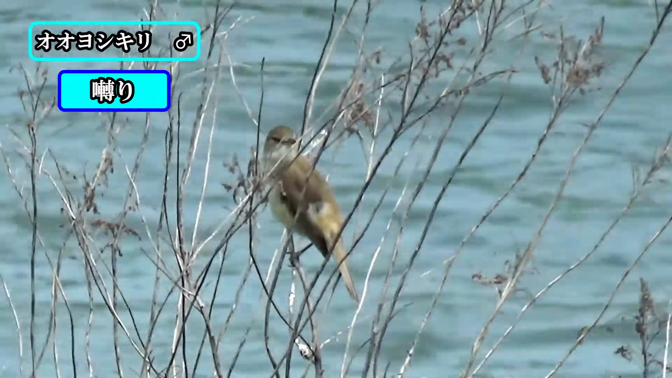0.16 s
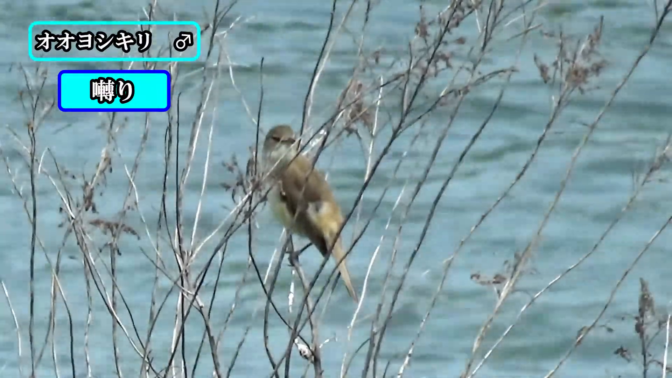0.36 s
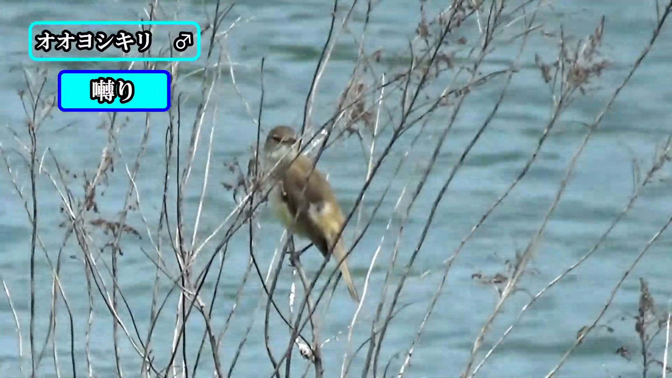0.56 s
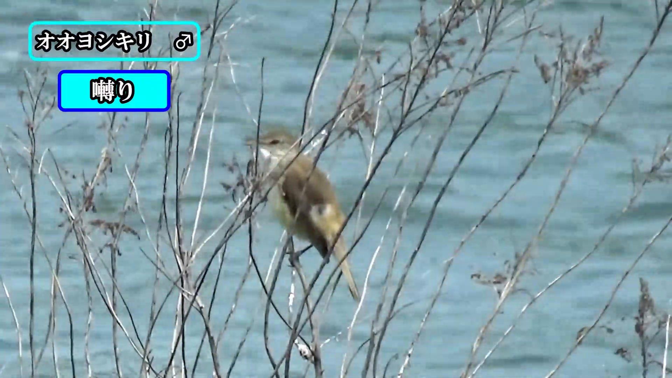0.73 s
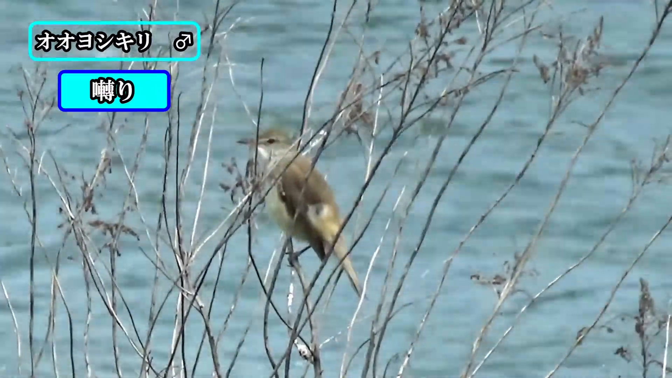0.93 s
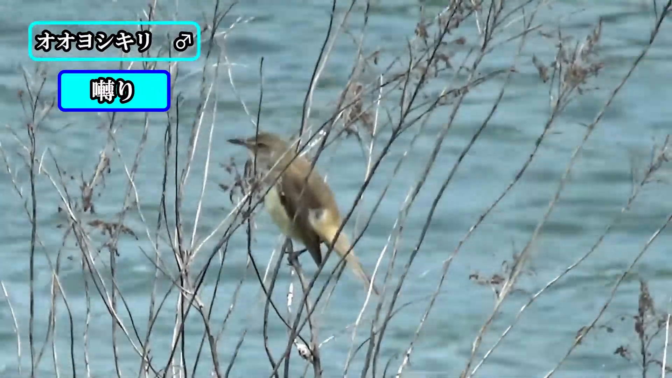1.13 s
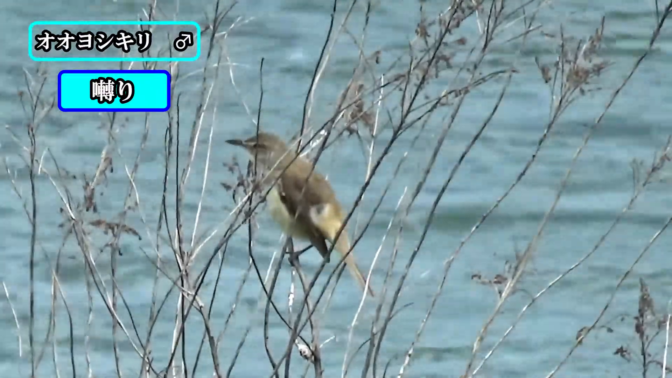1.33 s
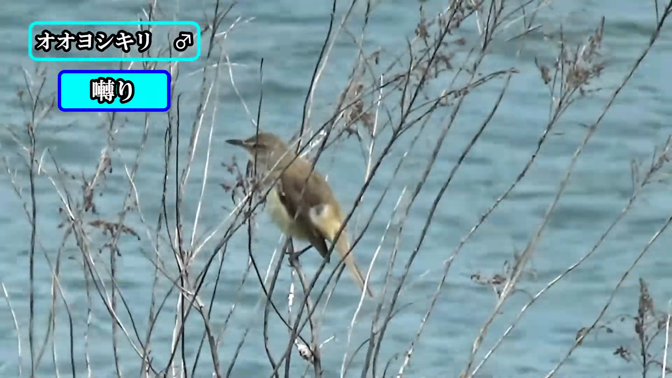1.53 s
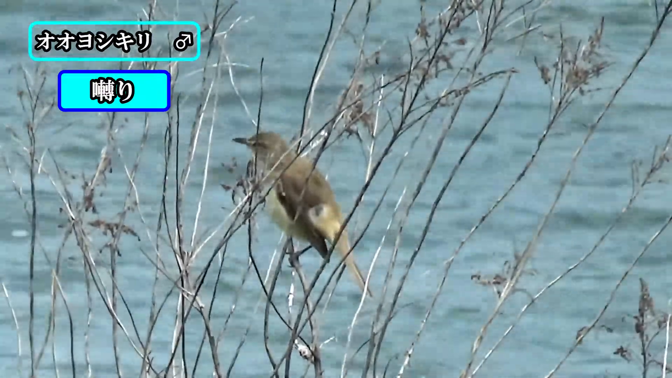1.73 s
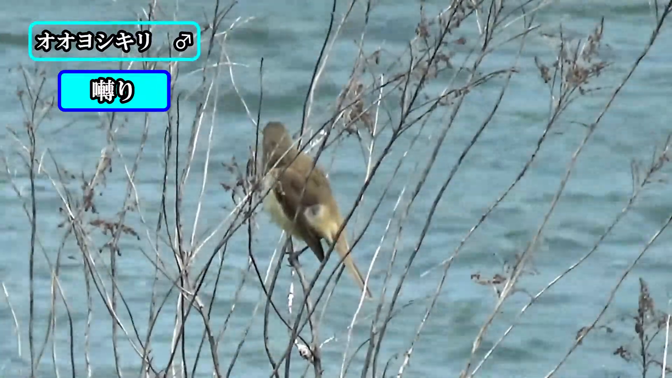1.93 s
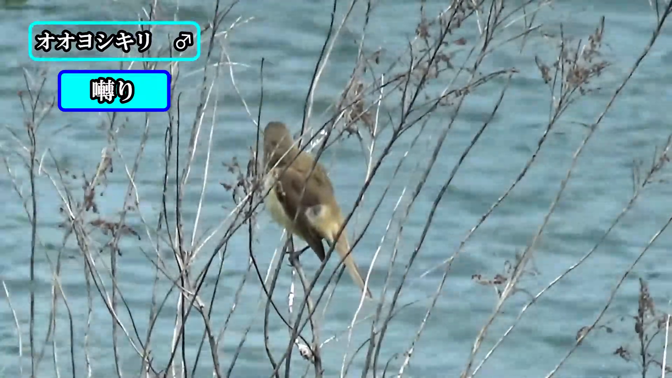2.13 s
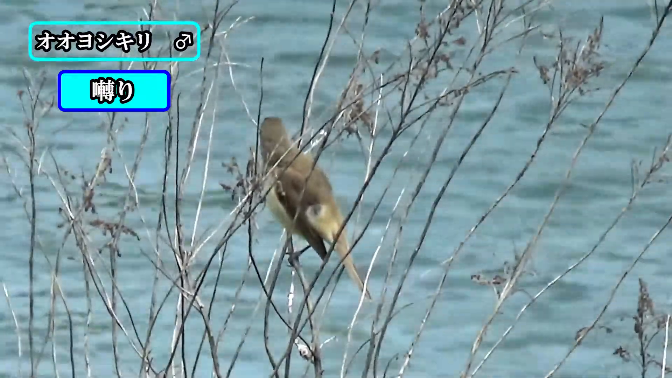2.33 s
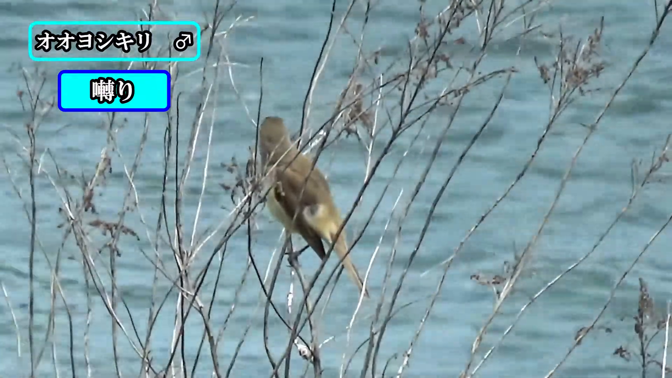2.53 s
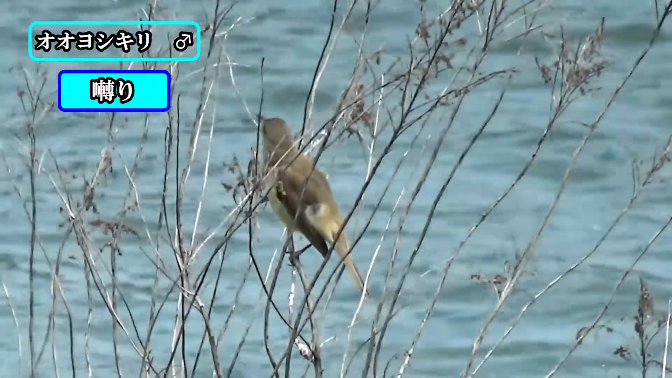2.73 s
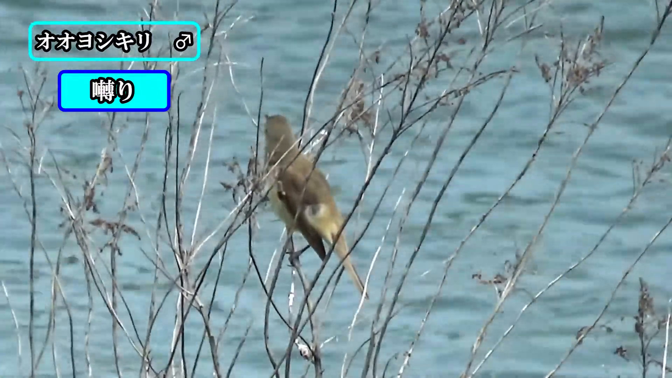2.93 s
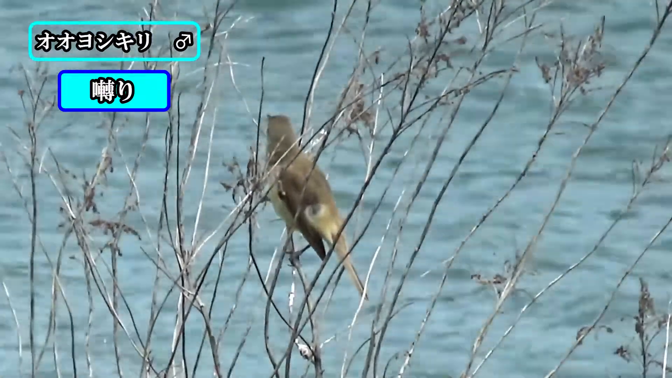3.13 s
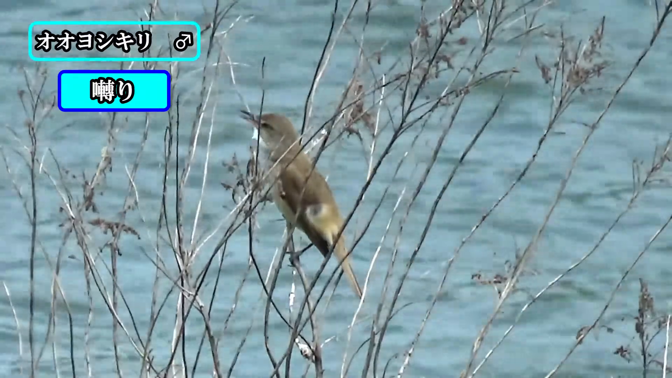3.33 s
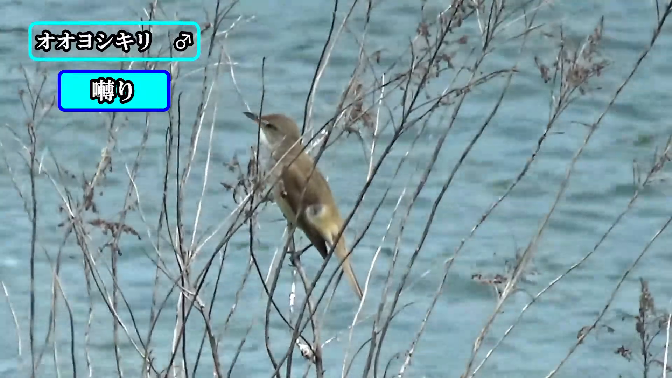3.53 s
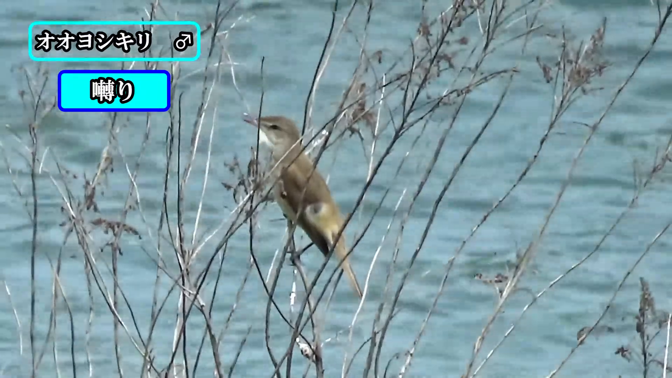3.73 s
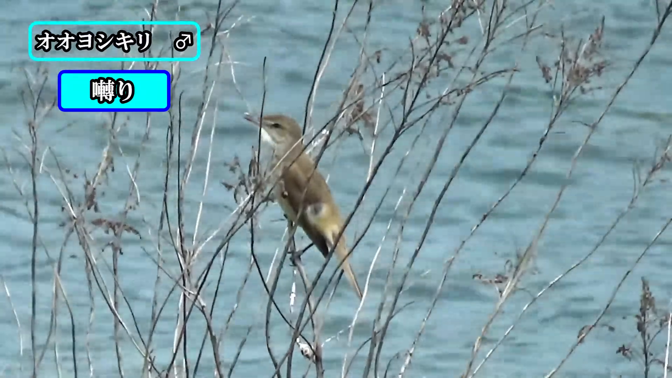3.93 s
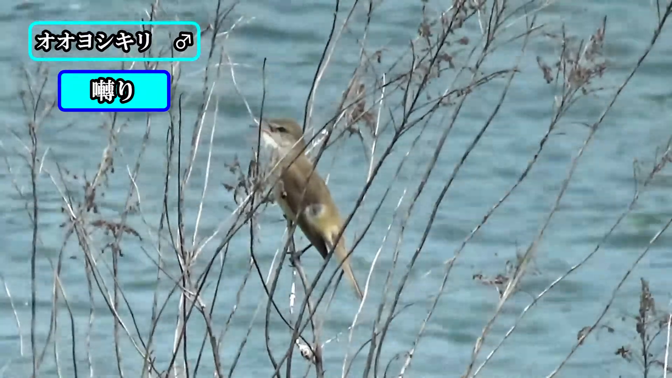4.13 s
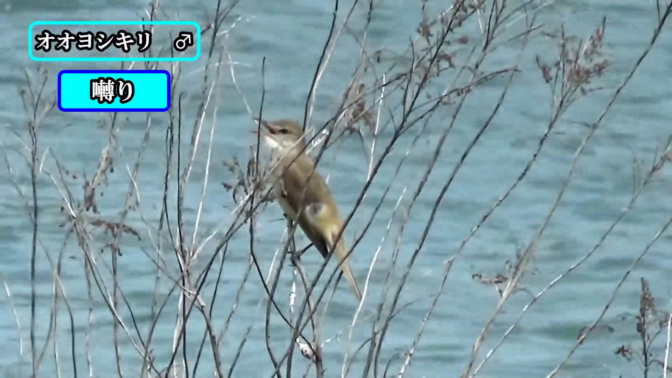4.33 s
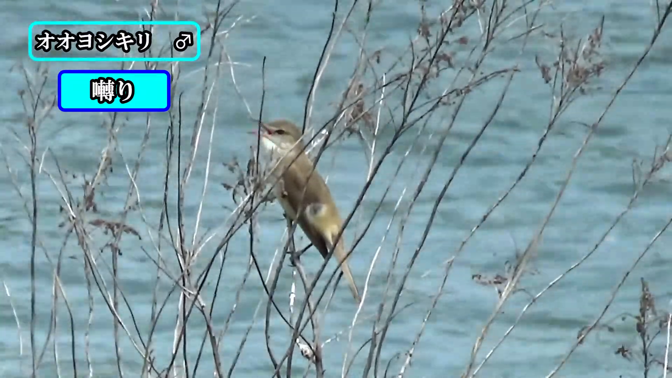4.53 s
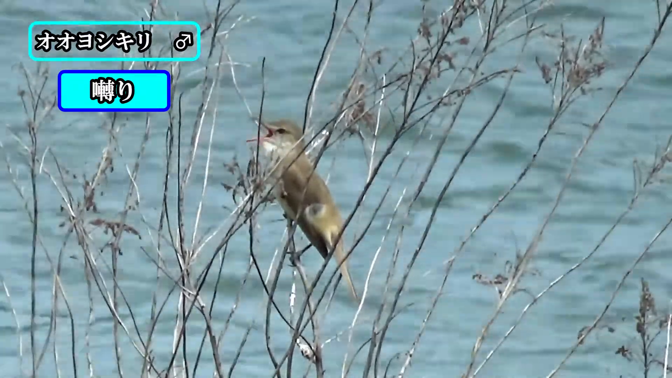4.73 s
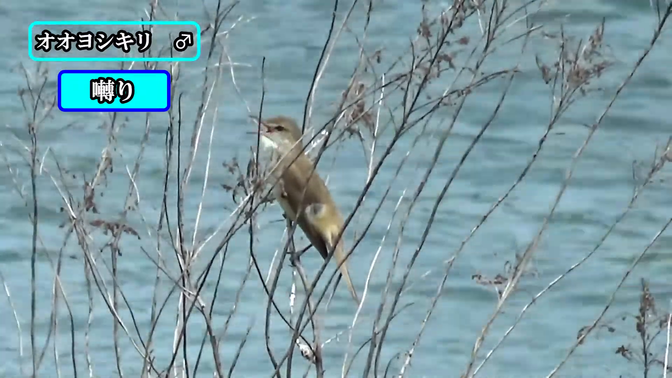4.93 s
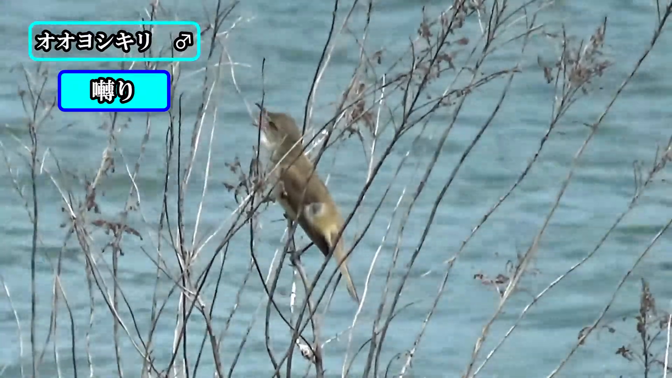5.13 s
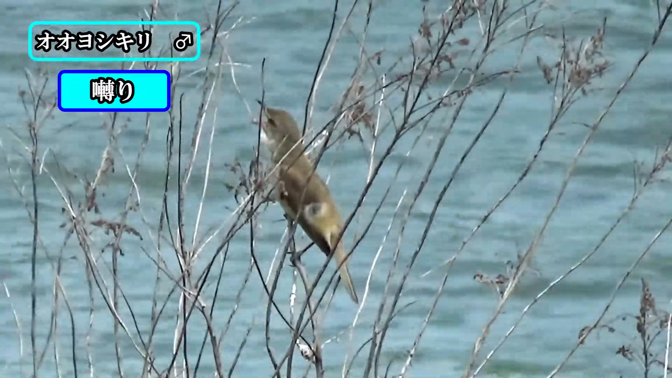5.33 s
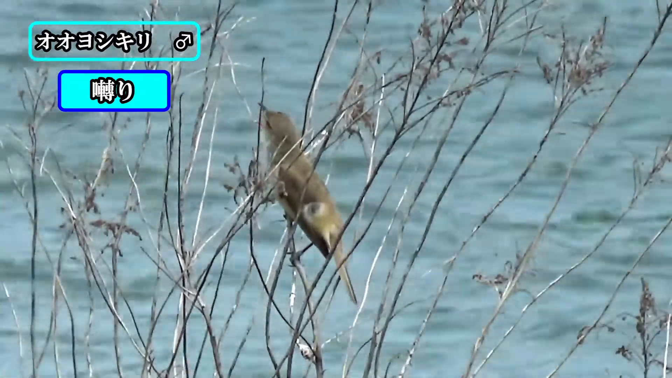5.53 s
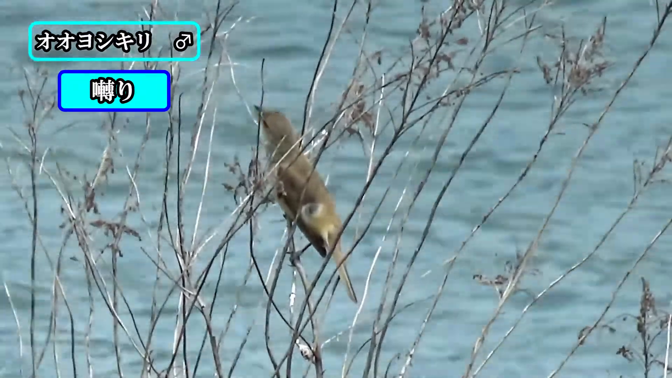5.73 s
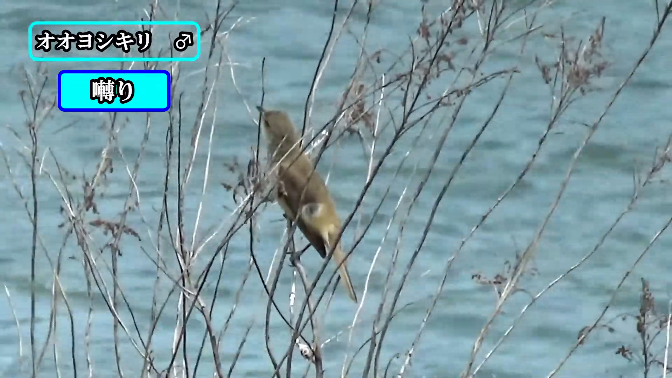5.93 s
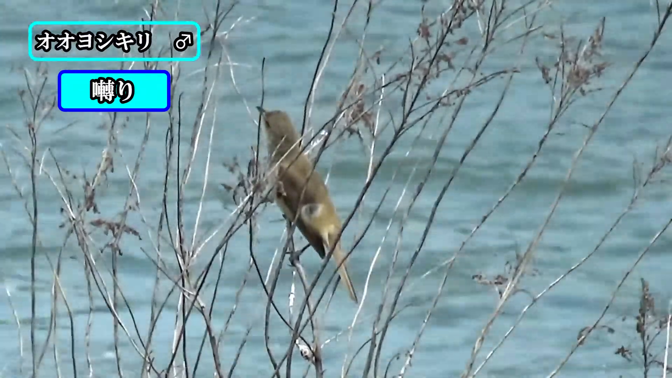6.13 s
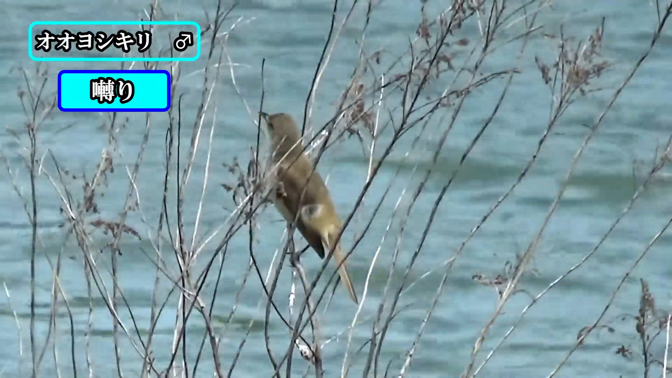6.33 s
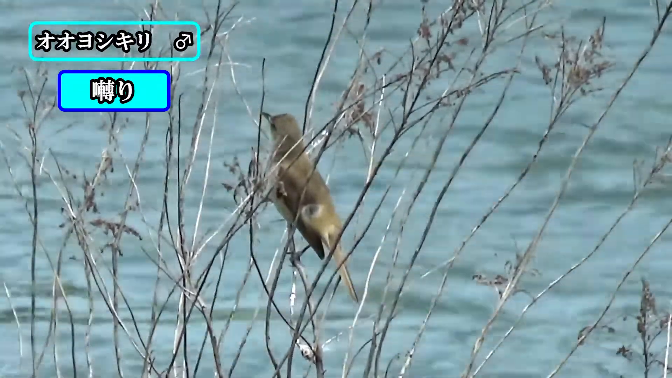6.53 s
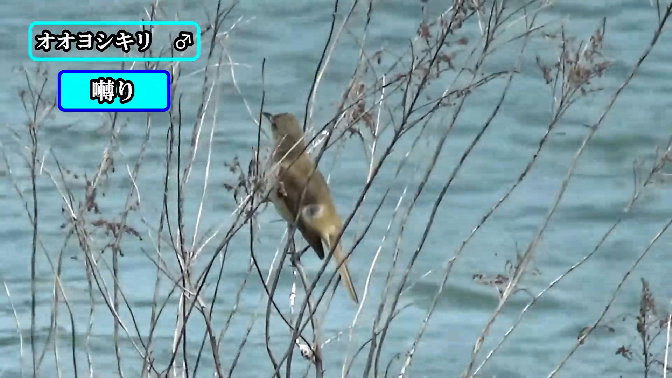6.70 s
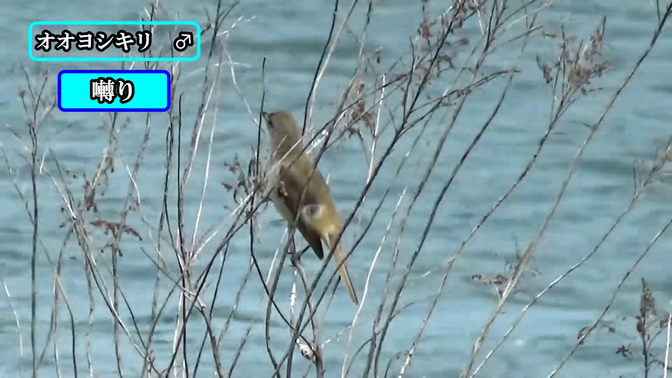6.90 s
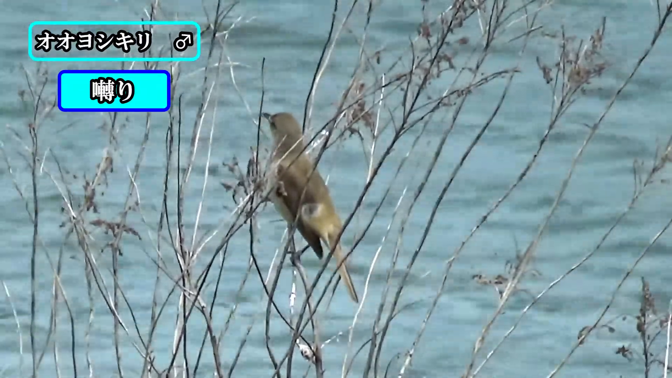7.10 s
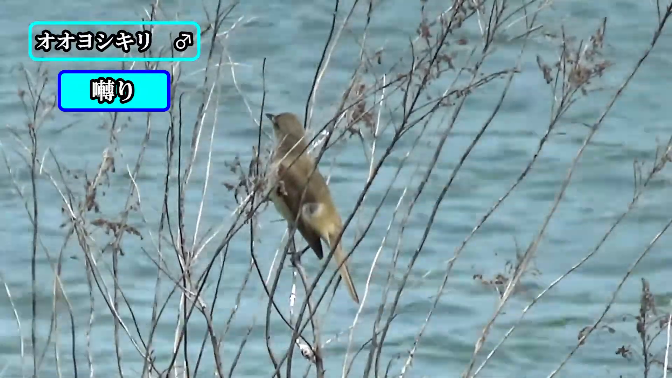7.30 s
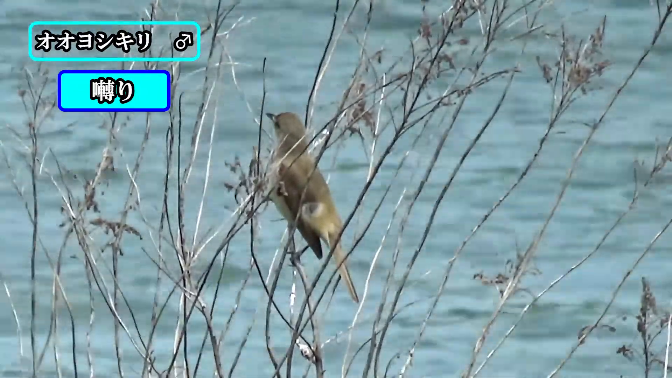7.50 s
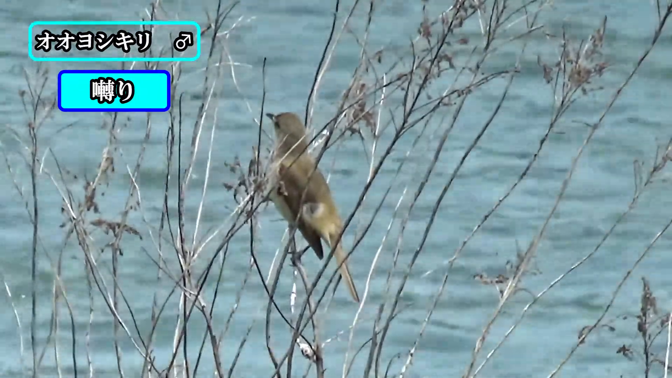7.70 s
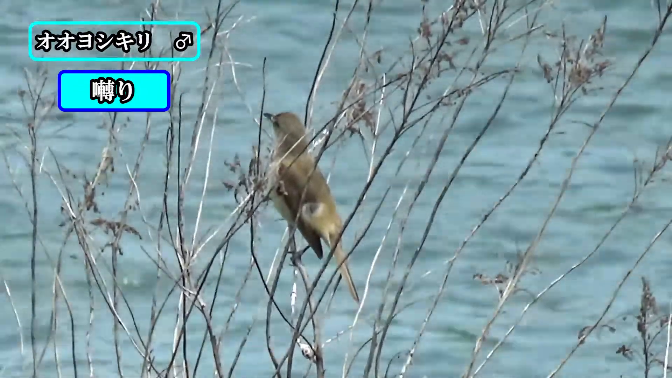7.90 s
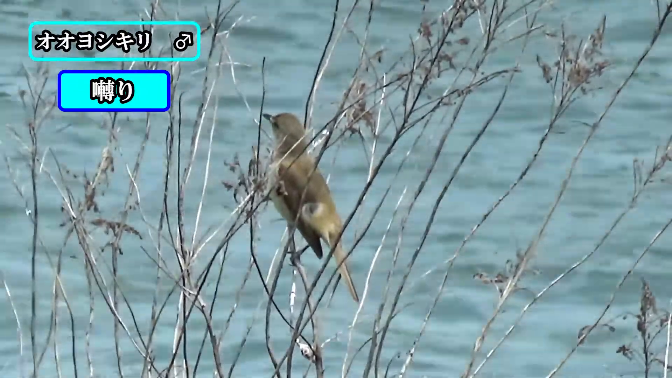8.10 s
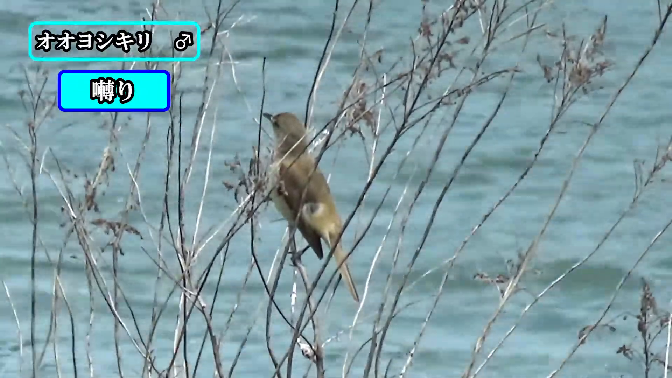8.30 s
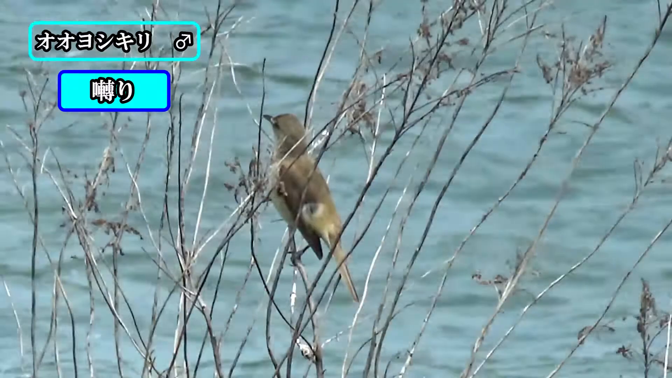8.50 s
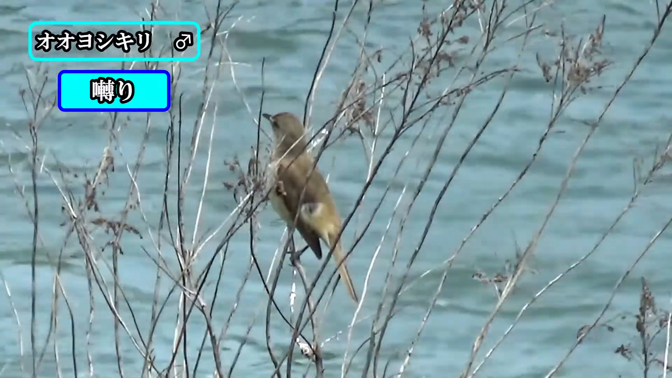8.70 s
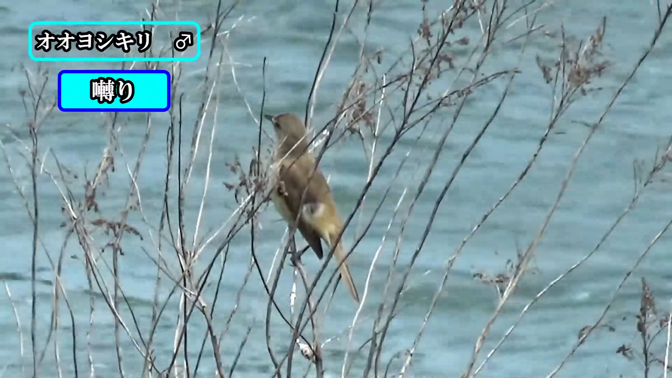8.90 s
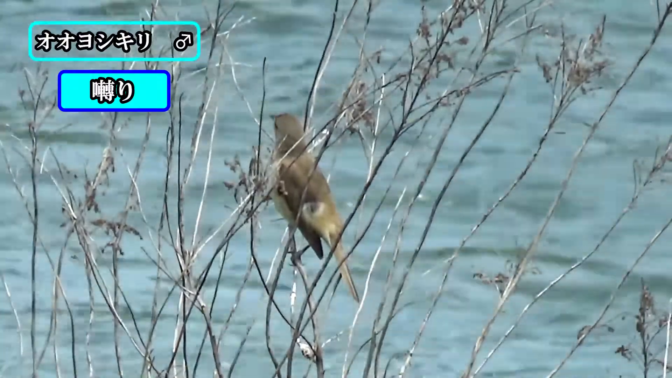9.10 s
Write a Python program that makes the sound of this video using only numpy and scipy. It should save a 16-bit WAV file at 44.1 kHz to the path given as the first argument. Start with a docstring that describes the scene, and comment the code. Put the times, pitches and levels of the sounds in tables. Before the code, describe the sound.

By a softly hissing lake, a nearby warbler croaks, whistles and rasps through one phrase, while faraway birds chirp and reeds rustle.

```python
"""Lakeside, nearly mono. Water hisses, reeds rustle in swells, far birds glide and chirp from the start.
At 1.4 s, one high tick. From 2.4 s a great reed warbler sings: three soft croaks (syrinx pulses ring
the throat), a gulp at 3.7 s, four clicked whistles from 4.1 s (both sides of the syrinx beat), and from
5.0 s four harsh rasps (chaotic vibration), each ending in a rattle. From 6.8 s far birds whistle and
sing again. Throughout, the bank returns a faint echo."""
import sys
import numpy as np
from scipy import signal
from scipy.fft import rfft, irfft
from scipy.io import wavfile
from scipy.ndimage import uniform_filter1d, map_coordinates

SR = 44100
rng = np.random.default_rng(int(sys.argv[2]) if len(sys.argv) > 2 else 0)


def transcribe(u):
    """Save the signal u as a 16-bit wav file named by the first command-line argument.

    u: samples, shape (n,) or (channels, n), limited to [-1, 1]; the rate is SR.
    q: integer samples, one column per channel.
    """
    v = np.clip(np.atleast_2d(u).T, -1, 1)
    q = np.round(v * 32767).astype(np.int16)
    wavfile.write(sys.argv[1], SR, q)


N = 403515


def undb(db):
    return 10 ** (np.asarray(db) / 20)


def level(x, db):
    """Scale to an rms level."""
    return x * undb(db) / np.sqrt(np.mean(x ** 2) + 1e-20)


def add(out, t_s, x):
    """Mix x in at t_s."""
    i = int(t_s * SR)
    out[i:i + len(x)] += x[:len(out) - i]


def progress(length_s):
    """Ramp 0 to 1 over a note."""
    return np.linspace(0, 1, max(int(length_s * SR), 64))


def phase_rad(hz):
    """Running phase of a frequency curve."""
    return 2 * np.pi * np.cumsum(hz) / SR


def gate(u, rise, fall):
    """Smooth on/off; rise and fall as shares of the note."""
    return np.sin(np.pi / 2 * np.clip(np.minimum(u / rise, (1 - u) / fall), 0, 1)) ** 2


def wobble(size, hz):
    """Smooth noise up to about hz, spread about 1."""
    points = rng.standard_normal(int(size * hz * 2 / SR) + 8)
    return map_coordinates(points, [2 + np.arange(size) * hz * 2 / SR], order=3, mode="nearest")


def colour(x, points):
    """Minimum-phase filter through (f/Hz, gain/dB) points."""
    hz, db = np.transpose(points)
    size = 4096
    bins_hz = np.maximum(np.fft.rfftfreq(size, 1 / SR), 1)
    gain = undb(np.interp(np.log(bins_hz), np.log(hz), db))
    cepstrum = irfft(np.log(gain))
    cepstrum[1:size // 2] *= 2
    cepstrum[size // 2 + 1:] = 0
    return signal.fftconvolve(x, irfft(np.exp(rfft(cepstrum))))[:len(x)]


def resonate(x, hz, width_hz, stages=1):
    """Two-pole resonances in series, unity gain at hz."""
    for _ in range(stages):
        x = signal.lfilter(*signal.iirpeak(hz, hz / width_hz, fs=SR), x)
    return x


def swells(rows, floor_db):
    """Gain of bell-shaped swells, power-summed over a floor."""
    t = np.arange(N) / SR
    power = sum(undb(db) ** 2 * np.exp(-((t - t_s) / half_s) ** 2) for t_s, half_s, db in rows)
    return np.sqrt(undb(floor_db) ** 2 + power)


# water hiss: f/Hz, gain/dB
WATER_SPECTRUM = [(30, -9.5), (62, -17), (95, -11.5), (135, -17.5), (260, -16), (350, -9.5), (500, -10),
                  (1300, 1), (2000, 1.5), (4200, -3), (4900, -11.5), (6200, -5), (7800, -11.5),
                  (9200, -15.5), (15500, -22.5)]
# left-right difference of the hiss: f/Hz, gain/dB
SIDE_SPECTRUM = [(60, -22), (250, -4), (500, 9), (1000, 7.5), (2000, 3), (5000, -12), (10000, -3.5),
                 (14000, -38)]
# reed rustle: f/Hz, gain/dB
RUSTLE_SPECTRUM = [(500, -26.5), (1300, -4.5), (2400, 0.5), (4200, -1), (4900, -10), (5500, -8), (6200, -5),
                   (7000, -6.5), (8200, -12), (9200, -26), (15000, -31.5)]
# ringing bands in the rustle: f/Hz, width/Hz, level/dB re rustle
RUSTLE_BANDS = [(5450, 130, -10.5), (2657, 140, -9.5)]
# swells of rustling noise (at 4.55 s, a soft wash behind the whistles): peak t/s, half width/s, level/dB
RUSTLE_SWELLS = [(0.33, 0.38, -55), (1.42, 0.23, -53), (2.7, 0.79, -59), (4.55, 0.41, -51.5),
                 (6.2, 0.13, -48.5), (8.75, 0.35, -63)]
# rumble: peak t/s, half width/s, level/dB
RUMBLE_SWELLS = [(0.05, 0.18, -80), (4.7, 0.3, -79.5), (8.0, 0.11, -75), (8.72, 0.15, -75.5)]


def lakeside(water_db=-53.5, sway_db=0.6, grain_db=2.5, side_db=-86):
    """Even water hiss, grainy swelling rustle, faint rumble."""
    water = level(colour(rng.standard_normal(N), WATER_SPECTRUM), water_db)
    water *= undb(sway_db * wobble(N, 3))
    grains = rng.standard_normal(N) * undb(grain_db * wobble(N, 150))
    rustle = level(colour(grains, RUSTLE_SPECTRUM), 0)
    for hz, width_hz, db in RUSTLE_BANDS:
        rustle += level(resonate(rng.standard_normal(N), hz, width_hz), db)
    rustle *= swells(RUSTLE_SWELLS, floor_db=-62.5)
    rumble = level(resonate(rng.standard_normal(N), hz=91, width_hz=56, stages=2), 0)
    rumble *= swells(RUMBLE_SWELLS, floor_db=-91)
    side = level(colour(rng.standard_normal(N), SIDE_SPECTRUM), side_db)
    return water + rustle + rumble + np.array([[1], [-1]]) * side


# far syllables, by name: t/s, f/top pitch
SYLLABLE_SHAPES = {"arch": [(0, 0.96), (.04, 0.98), (.079, .93)], "coo": [(0, 0.85), (.03, 0.99),
                   (.062, .8)], "drop": [(0, 1), (.029, .5)], "slur": [(0, .82), (.05, .91), (.075, 1),
                   (.095, .85), (.128, .77)], "hook": [(0, .63), (.028, .86), (.058, 0.95), (.068, .88),
                   (.078, .62), (.092, .44)], "warble": [(0, .88), (.018, 0.98), (.04, .54), (.056, .57),
                   (.075, .87), (.096, 1)]}


def contour_hz(name, top_hz):
    """Pitch curve of a syllable, corners rounded."""
    t_s, ratio = np.transpose(SYLLABLE_SHAPES[name])
    shape = np.interp(progress(t_s[-1]) * t_s[-1], t_s, ratio)
    return top_hz * uniform_filter1d(shape, size=180, mode="nearest")


def far_note(hz, db, waver=0.0065, flicker_db=3, upper_ratio=1.12, upper_db=-14, reach_hz=5100):
    """Two-voiced glide flickering through reeds; fast glides hoarse, falls and high pitches faint."""
    size = len(hz)
    slope_per_s = np.gradient(np.log(hz)) * SR
    hoarse = waver + 0.0015 * np.abs(slope_per_s)
    phase = phase_rad(hz * (1 + hoarse * wobble(size, 606)))
    upper = undb(upper_db) * np.minimum(hoarse / 0.0068, 1) * np.sin(upper_ratio * phase)
    fall_loss = 1 + 0.016 * np.maximum(-slope_per_s, 0)
    treble_loss = np.hypot(1, (hz / reach_hz) ** 6)
    envelope = gate(np.linspace(0, 1, size), 0.14, 0.15) / fall_loss / treble_loss
    flicker = undb(flicker_db * wobble(size, 129.96))
    return level((np.sin(phase) + upper) * envelope * flicker, db)


# far song: t/s, syllable, top f/Hz, level/dB
FAR_NOTES = [(0.075, "coo", 1970, -55), (0.121, "arch", 3110, -52), (0.275, "arch", 3110, -50.5),
             (0.445, "drop", 2700, -56), (1.39, "hook", 4900, -63), (1.99, "arch", 3490, -54.5),
             (2.255, "slur", 4070, -51.5), (2.622, "hook", 4850, -55), (2.945, "hook", 5050, -59),
             (7.727, "coo", 2140, -50), (7.837, "warble", 3080, -49), (7.979, "arch", 3560, -47),
             (8.155, "drop", 3100, -52), (8.245, "slur", 4100, -47.5), (8.608, "hook", 5150, -47),
             (8.886, "hook", 5080, -48)]
# second-voice drops under each arch: delay/s, f/top pitch, level/dB re arch
DROPS_UNDER_ARCH = [(0.037, 1, -4), (0.066, 0.78, -8)]
# far whistles: t/s, length/s, f/Hz, level/dB, waver/pitch
THIN_WHISTLES = [(6.76, 0.18, 10700, -71, 0.028), (7.30, 0.44, 1795, -61.5, 0.006),
                 (8.416, 0.13, 6220, -62.5, 0.0078)]


def far_birds():
    """One bird sings from a small stock of syllables; others whistle thinly."""
    out = np.zeros(N)
    for t_s, name, top_hz, db in FAR_NOTES:
        add(out, t_s, far_note(contour_hz(name, top_hz), db))
        if name == "arch":
            for delay_s, ratio, drop_db in DROPS_UNDER_ARCH:
                add(out, t_s + delay_s, far_note(contour_hz("drop", ratio * top_hz), db + drop_db))
    for t_s, length_s, hz, db, waver in THIN_WHISTLES:
        add(out, t_s, far_note(hz * np.ones_like(progress(length_s)), db, waver))
    return out


def faint_chirps(count=14, low_hz=1700, high_hz=4200, db=-61, spread_db=2):
    """Random chirps from deep in the reed bed."""
    out = np.zeros(N)
    for when, pitch, loudness, kind in rng.random((count, 4)):
        hz = contour_hz("coo" if kind > .5 else "drop", low_hz + pitch * (high_hz - low_hz))
        add(out, when * N / SR, far_note(hz, db + spread_db * (2 * loudness - 1)))
    return out


def high_tick(t_s=1.44, length_s=0.0046, hz=9200, db=-39, jitter=0.072):
    """One tiny tick: a jittered sine burst."""
    out, u = np.zeros(N), progress(length_s)
    tone = np.sin(phase_rad(hz * (1 + jitter * wobble(len(u), 2300))))
    add(out, t_s, level(tone * gate(u, 0.28, 0.53), db))
    return out


def syrinx_pulses(size, rate_hz, jitter):
    """One impulse per opening of the syrinx, unevenly spaced."""
    turns = np.cumsum(rate_hz * np.exp(jitter * wobble(size, rate_hz / 2))) / SR
    return np.diff(np.floor(turns), prepend=-1)


# throat resonances: f/throat pitch, width/Hz, gain/dB
THROAT_MODES = [(1, 270, 4.5), (1.5, 420, -11.5)]
# croaks: t/s, pulse rate/Hz, throat f/Hz, level/dB, buzz/dB re body, pressure skew (>1 crests late)
CROAK_NOTES = [(2.394, 275, 2336, -37.5, -30, 1.16), (2.862, 278.3, 2410, -34, -33, 1.14),
               (3.320, 278.5, 2420, -33.5, -24, 1.38)]


def croaks(length_s=0.058, bend=0.083):
    """Pulses ring the throat; pressure lifts rate, resonances and level in mid-note."""
    out, u = np.zeros(N), progress(length_s)
    for t_s, rate_hz, throat_hz, db, buzz_db, skew in CROAK_NOTES:
        pressure = np.abs(np.sin(np.pi * u ** skew))
        train = syrinx_pulses(len(u), rate_hz, jitter=0.013)
        train *= (0.37 + pressure ** 1.3) * gate(u, .04, 0.087)
        body = sum(undb(gain_db) * resonate(train, ratio * throat_hz, width_hz, stages=2)
                   for ratio, width_hz, gain_db in THROAT_MODES)
        buzz = resonate(train, hz=10000, width_hz=1700, stages=2)
        voice = level(body, 0) + level(buzz, buzz_db)
        warped_index = np.cumsum(1 + bend * (pressure - .9))  # slower at low pressure
        add(out, t_s, level(map_coordinates(voice, [warped_index], order=3), db))
    return out


# open-beak colour of clicks, creaks, stutters and breath: f/Hz, gain/dB
BEAK_SPECTRUM = [(1000, -38), (2300, -18.5), (3300, -3), (4300, 3), (5400, -3.5), (6500, -6.5),
                 (7500, -15.5), (9000, -11), (9700, -6), (10700, -19), (15000, -27)]


def creak(length_s, db, throat_hz=3400, edge_db=-9, rate_hz=410):
    """Separate weak pulses as pressure builds."""
    u = progress(length_s)
    train = syrinx_pulses(len(u), rate_hz, jitter=0.24) * (0.53 + u)
    throat = resonate(train, throat_hz, width_hz=1000, stages=2)
    edge = colour(train, BEAK_SPECTRUM)
    return level(level(throat, 0) + level(edge, edge_db), db)


# hiss in a rasp: f/mean pitch, gain/dB
RASP_SPECTRUM = [(.3, -21), (.52, -4.5), (.8, -1), (1.25, 4), (1.65, -10.5), (2.1, -8.5), (2.65, -12),
                 (3.3, -30), (4.8, -39)]


def rasp(length_s, start_hz, end_hz, db, flutter_hz, depth, hiss_db, sizzle_db, fade_db):
    """Tone shaken by chaotic vibration, plus hiss and sizzle, chopped into puffs by a flutter."""
    u = progress(length_s)
    size = len(u)
    pitch_hz = (start_hz + (end_hz - start_hz) * u) * (1 + 0.0663 * wobble(size, 520))
    # the vibration collapses and restarts at random; its swing saturates
    swing = 1 + 0.8 * (wobble(size, 420) + 1j * wobble(size, 420))
    phase = phase_rad(pitch_hz) + np.angle(swing)
    tone = (np.sin(phase) + undb(-28) * np.sin(2 * phase)) * np.tanh(0.97 * np.abs(swing))
    mean_hz = (start_hz + end_hz) / 2
    hiss = colour(rng.standard_normal(size), [(k * mean_hz, gain_db) for k, gain_db in RASP_SPECTRUM])
    sizzle = resonate(rng.standard_normal(size), hz=12200, width_hz=3000, stages=2)
    flutter = phase_rad(flutter_hz * (1 + 0.051 * wobble(size, 68)))
    puffs = 1 - depth * np.cos(flutter / 2) ** 2
    voice = level(tone, 0) + level(hiss, hiss_db) + level(sizzle, sizzle_db)
    envelope = undb(fade_db * u) * gate(u, 0.00079 / length_s, 0.0025 / length_s)
    return level(voice * puffs * envelope, db)


def gulp(t_s=3.7198, creak_lead_s=0.042, fall_delay_s=0.0102):
    """Faint creak, rising chip, then a steeply falling rasp."""
    out = np.zeros(N)
    add(out, t_s - creak_lead_s, creak(length_s=0.025, db=-48))
    chip = rasp(length_s=0.0099, start_hz=2940, end_hz=3420, db=-31, flutter_hz=240, depth=0.3,
                hiss_db=-6, sizzle_db=-40, fade_db=6)
    fall = rasp(length_s=0.022, start_hz=2940, end_hz=1700, db=-32, flutter_hz=268, depth=0.39,
                hiss_db=-7.5, sizzle_db=-25, fade_db=-13)
    add(out, t_s, chip)
    add(out, t_s + fall_delay_s, fall)
    return out


def click(db, length_s=0.016, rate_hz=950, puff_s=0.00026):
    """Fast uneven pulses through the wide open beak, each with a puff of turbulence."""
    u = progress(length_s)
    train = syrinx_pulses(len(u), rate_hz, jitter=.3)
    puffs = signal.lfilter([1], [1, -np.exp(-1 / (puff_s * SR))], train) * rng.standard_normal(len(u))
    source = 0.27 * train + undb(-13) * puffs
    ring = np.tanh(level(colour(source, BEAK_SPECTRUM), -13))  # membrane swing saturates
    envelope = .05 + np.abs(np.sin(np.pi * u)) ** 1.3
    return level(ring * envelope, db)


def stutter(hz, db, length_s=0.027, width_hz=1000, octave_db=-9):
    """The syrinx stutters before the whistle takes hold."""
    u = progress(length_s)
    train = syrinx_pulses(len(u), rate_hz=900, jitter=0.37) * (.5 + u) * gate(u, 0.083, 0.15)
    source = colour(train, BEAK_SPECTRUM)
    octave = undb(octave_db) * resonate(source, 2 * hz, width_hz)
    return level(resonate(source, hz, width_hz) + octave, db)


def whistle(length_s, hz, slide_hz, db, swell_db, share, sag_hz=44.7, beat_hz=382):
    """Both sides of the syrinx beat; the lower fades by mid-note, leaving a rough, wavering tone."""
    u = progress(length_s)
    size = len(u)
    pitch_hz = hz + slide_hz * (u - .5) - sag_hz * (2 * u - 1) ** 2
    phase = phase_rad(pitch_hz * (1 + 0.012 * wobble(size, 137)))
    lower_gain = share * np.interp(u, [0, .15, .33, .55, 1], [.5, 1, 1, .3, .3])
    beat = phase_rad(beat_hz * (1 + 0.26 * wobble(size, 63.7)))
    pressure = gate(u, 0.17, 0.24) * undb(swell_db * (u - .7) + 1.2 * wobble(size, 160))
    breath = level(colour(rng.standard_normal(size), BEAK_SPECTRUM), -22)
    tone = np.zeros(size)
    for k, harmonic_db in enumerate([0, -12, -26], 1):  # overtones: rougher, growing with pressure
        upper = np.sin(k * (phase + 0.16 * wobble(size, 700)))
        lower = lower_gain / np.sqrt(k) * np.sin(k * (phase - beat))
        flicker_db = 3.6 * np.sqrt(k - 1) * wobble(size, 131)
        tone += (upper + lower) * undb(harmonic_db + flicker_db) * pressure ** ((k - 1) / 2)
    return level((tone + breath) * pressure / np.hypot(1, lower_gain), db)


# clicked whistles: click t/s, wait/s, length/s, f/Hz, slide/Hz, level/dB, swell/dB, lower-voice share
WHISTLE_NOTES = [(4.074, 0.027, 0.088, 4660, 144, -31.5, 9, 0.16),
                 (4.273, 0.035, 0.075, 4790, 90, -27.5, 5, 0.42),
                 (4.475, 0.026, 0.088, 4916, 160, -27.5, 4.5, 0.62),
                 (4.702, 0.029, 0.094, 4796, -300, -27.5, 4, 0.45)]


def clicked_whistles(creak_lead_s=0.011, stutter_lead_s=0.024):
    """Each syllable: creak, click, stutter, whistle."""
    out = np.zeros(N)
    for t_s, wait_s, length_s, hz, slide_hz, db, swell_db, share in WHISTLE_NOTES:
        add(out, t_s - creak_lead_s, creak(length_s=0.016, db=-42, edge_db=-1))
        add(out, t_s, click(db + 0.16))
        add(out, t_s + wait_s - stutter_lead_s, stutter(hz, db - 13))
        add(out, t_s + wait_s, whistle(length_s, hz, slide_hz, db, swell_db, share))
    return out


# rasps: t/s, length/s, flutter/Hz, rattle rate/Hz, rattle level/dB, hiss/dB re tone, sizzle/dB re tone
RASP_NOTES = [(5.0406, 0.037, 144.4, 148, -33.5, -8.5, -25.5), (5.231, 0.036, 192, 120, -35, -11.5, -33),
              (5.410, 0.04, 199, 135.4, -33.5, -10, -39), (5.625, 0.041, 196, 120.4, -35.5, -11, -43)]


def harsh_syllables(creak_lead_s=0.021, chip_lead_s=0.0193, rattle_gap_s=0.005):
    """Each syllable: creak, chip, sinking rasp, then a softer, deeply chopped rattle."""
    out = np.zeros(N)
    for t_s, length_s, flutter_hz, rattle_hz, rattle_db, hiss_db, sizzle_db in RASP_NOTES:
        chip_at_s = t_s - chip_lead_s
        add(out, chip_at_s - creak_lead_s, creak(length_s=0.018, db=-42.5, throat_hz=3500, edge_db=-18))
        chip = rasp(length_s=0.0105, start_hz=3420, end_hz=3420, db=-29.3, flutter_hz=268,
                    depth=0.2, hiss_db=hiss_db + 3, sizzle_db=sizzle_db - 7, fade_db=-3)
        body = rasp(length_s, start_hz=3240, end_hz=2986, db=-25, flutter_hz=flutter_hz,
                    depth=0.29, hiss_db=hiss_db, sizzle_db=sizzle_db, fade_db=-1)
        rattle = rasp(length_s=0.05, start_hz=3150, end_hz=2960, db=rattle_db, flutter_hz=rattle_hz,
                      depth=0.8, hiss_db=hiss_db - 2, sizzle_db=sizzle_db + 3, fade_db=1.5)
        add(out, chip_at_s, chip)
        add(out, t_s, body)
        add(out, t_s + length_s + rattle_gap_s, rattle)
    return out


def warbler(bass_cut_hz=1400):
    """The near bird's phrase, kept clear of the bass."""
    phrase = croaks() + gulp() + clicked_whistles() + harsh_syllables()
    return signal.sosfilt(signal.butter(4, bass_cut_hz, "high", fs=SR, output="sos"), phrase)


def bank(x, echo_db, tail_db, t60_s, echo_s=.031):
    """One dull echo from the shore, thin scatter from the stalks."""
    t = np.arange(SR) / SR
    scatter = rng.standard_normal(SR) * undb(-60 * t / t60_s) * (1 - np.exp(-t / 0.0018))
    response = scatter * undb(tail_db) / np.linalg.norm(scatter)
    response[int(echo_s * SR)] += undb(echo_db)
    response = colour(response, [(1500, 0.5), (3200, 3), (4700, 1), (9000, 0.5), (15000, -24)])
    return signal.fftconvolve(x, response)[:N]


def treble_width(x, db, t60_s=0.028, band_hz=(5200, 12000), delay_s=0.0024):
    """A faint, brief antiphase treble shimmer widens the near song."""
    t = np.arange(SR // 2) / SR
    response = rng.standard_normal(len(t)) * undb(-60 * t / t60_s) * (t > delay_s)
    response *= undb(db) / np.linalg.norm(response)
    treble = signal.sosfilt(signal.butter(2, band_hz, "band", fs=SR, output="sos"), x)
    return np.array([[1], [-1]]) * signal.fftconvolve(treble, response)[:N]


def scene(pan_db=0.17):
    """Birds and echoes over the lakeside hiss; far birds get more scatter."""
    near = warbler() + high_tick()
    far = far_birds() + faint_chirps()
    near += bank(near, echo_db=-24, tail_db=-21.5, t60_s=.28)
    far += bank(far, echo_db=-33, tail_db=-10, t60_s=0.24)
    mix = near + treble_width(near, db=-29) + far + lakeside()
    return mix * undb(np.array([[pan_db], [-pan_db]]) / 2)


def record(dry):
    """Steep low-pass at 15.7 kHz."""
    return signal.sosfilt(signal.ellip(10, .2, 70, 15700, fs=SR, output="sos"), dry)


dry = scene()
out = record(dry)
transcribe(out)
```